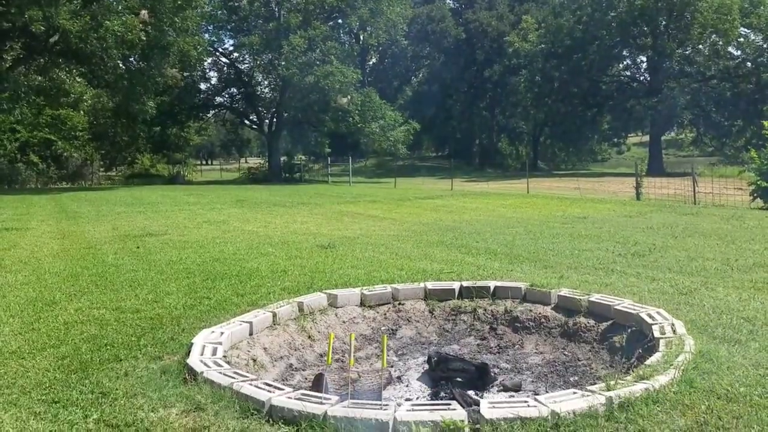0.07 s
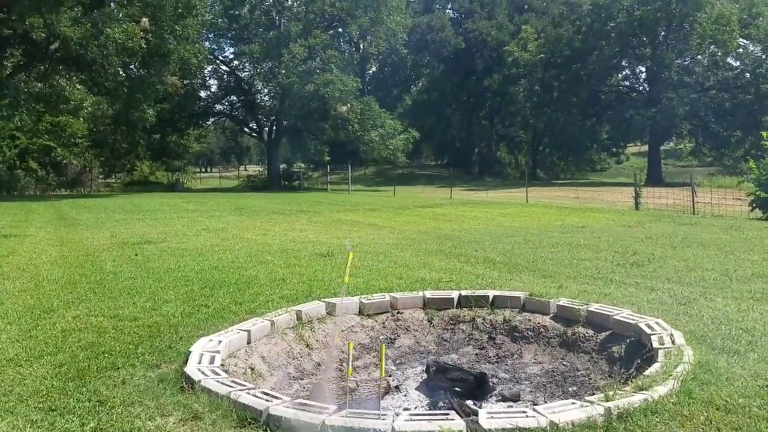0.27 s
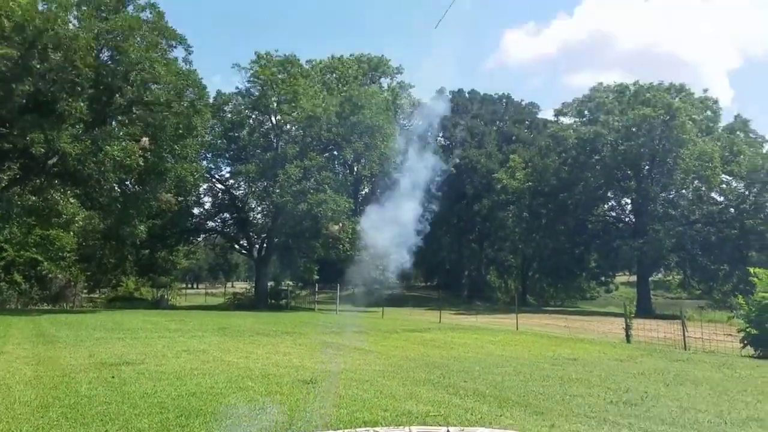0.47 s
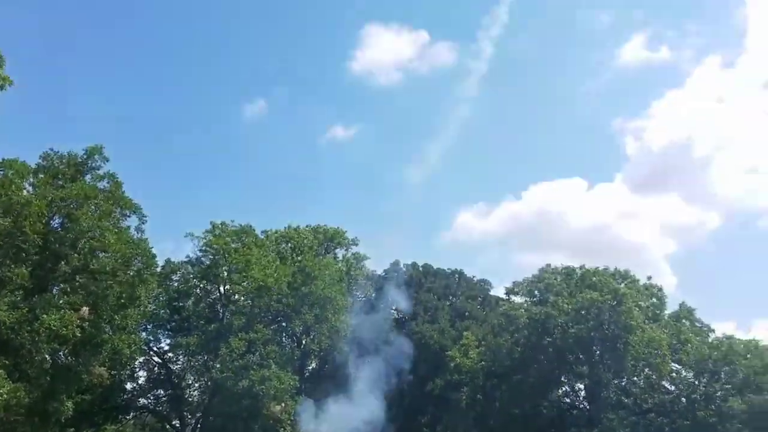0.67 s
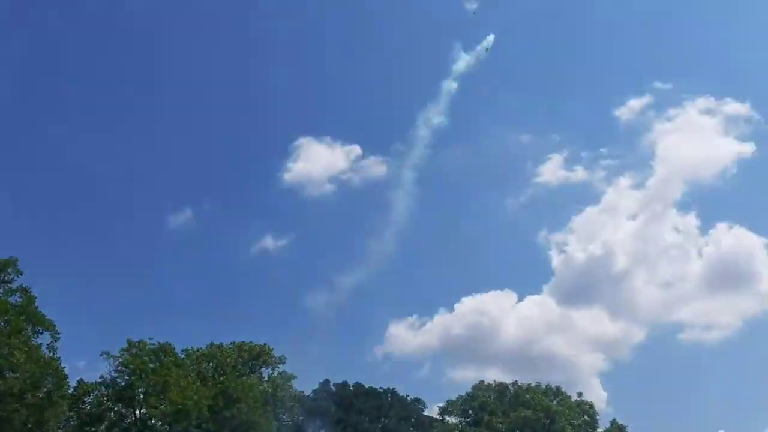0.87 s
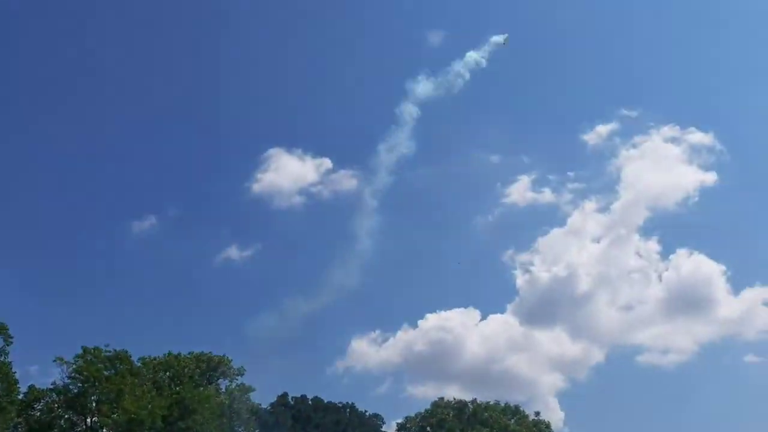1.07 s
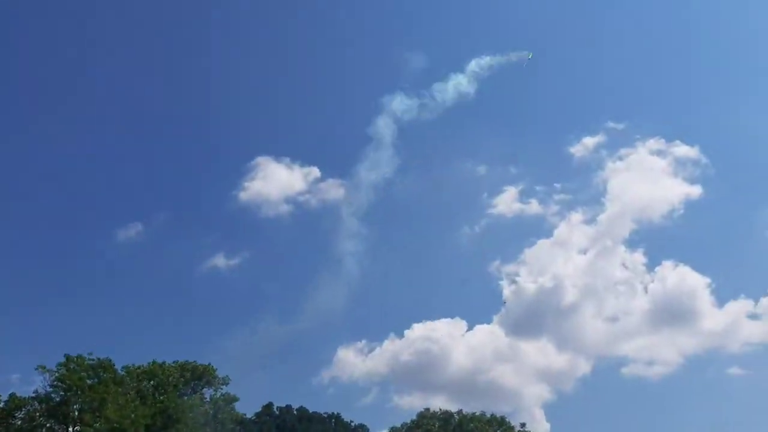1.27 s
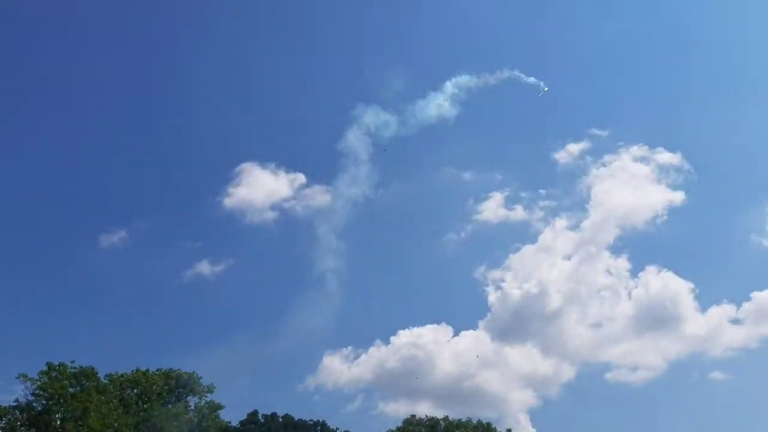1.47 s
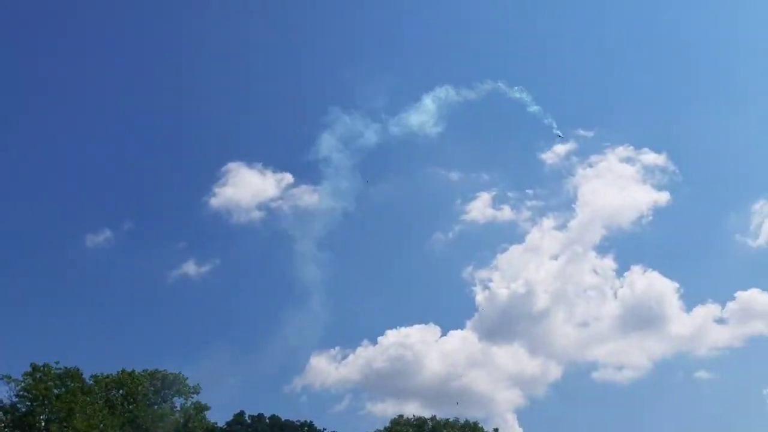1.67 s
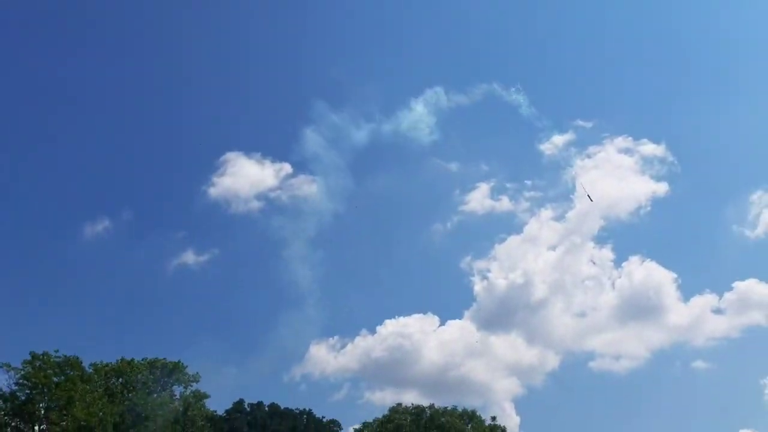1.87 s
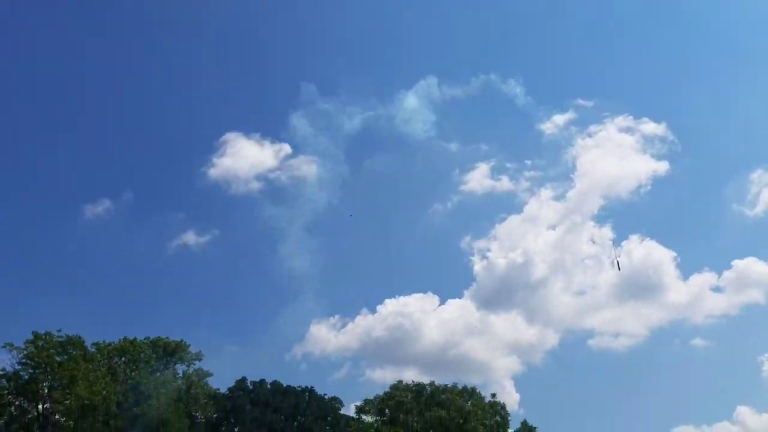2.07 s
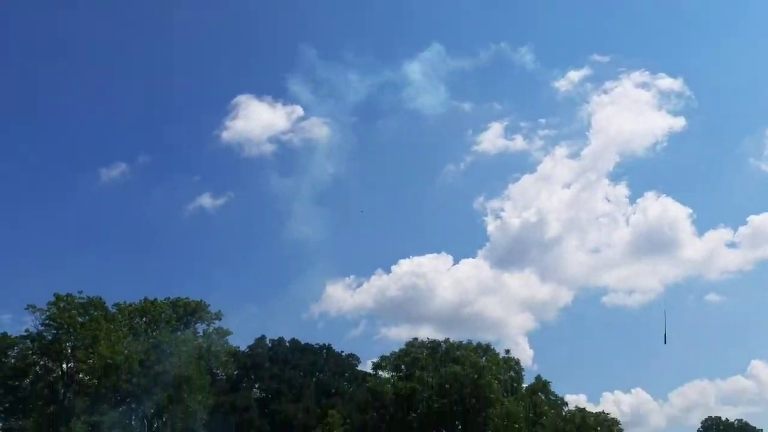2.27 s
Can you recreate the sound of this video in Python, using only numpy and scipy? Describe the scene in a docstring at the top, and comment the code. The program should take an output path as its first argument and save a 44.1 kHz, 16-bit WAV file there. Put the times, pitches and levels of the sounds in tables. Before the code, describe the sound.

A small firework rocket fizzes faintly, ignites in a stone pit, roars briefly past the close microphone and fades upward; two sharp overloaded cracks follow, scattering off grass and trees in an open yard.

```python
"""A fuse fizzes in a stone fire pit on a lawn ringed by trees: coloured noise, echoed by the pit walls.
The bottle rocket's motor lights, roars past the microphone and fades into the sky: sputtering noise.
Two charges crack overhead: noise bursts, blast waves and ringing tones, overloaded together.
Grass, yard and trees scatter each crack as decaying noise; distant surfaces return dull ticks.
Faint hum, air and hiss run throughout as shaped noise; the hiss swells after the bursts."""
import sys
import numpy as np
from scipy import signal
from scipy.fft import rfft, irfft
from scipy.io import wavfile

SR = 44100
rng = np.random.default_rng(int(sys.argv[2]) if len(sys.argv) > 2 else 0)


def master_out(mix):
    """Clip the mix to full scale and print it as 16-bit PCM to the path in sys.argv[1]."""
    frames = np.transpose(np.atleast_2d(mix))
    ceiling = np.clip(frames, -1, 1)
    pcm = np.round(ceiling * 32767).astype(np.int16)
    wavfile.write(sys.argv[1], SR, pcm)


N = 101429
T, HZ = np.arange(N) / SR, np.fft.rfftfreq(N, 1 / SR)

# Every *_COLOUR is a relative spectrum, every *_LEVEL a gain over time.
# Low distant hum: (frequency [Hz], level [dB])
HUM_COLOUR = [(25, -4.5), (60, -5.5), (110, 2), (150, 5.5), (220, -6), (400, -4), (800, -20), (2000, -26)]
# Hum: (time [s], level [dB])
HUM_LEVEL = [(0, -63.5), (.17, -57.5), (.2, -83), (.52, -89.5), (.65, -67), (.8, -75), (1.05, -83.5),
             (1.3, -75.5), (1.62, -73.5), (1.74, -66), (2.3, -63)]
# Soft air: (frequency [Hz], level [dB])
AIR_COLOUR = [(60, -24.5), (180, -11.5), (280, 3), (400, -4.5), (900, 2), (2100, 4.5), (3500, -0.5),
              (7500, -10), (9500, -25), (15000, -17)]
# Air: (time [s], level [dB])
AIR_LEVEL = [(0, -61), (.4, -71), (.8, -67.5), (1.5, -63.5), (1.75, -60), (2.3, -63)]
# Thin hiss: (frequency [Hz], level [dB])
HISS_COLOUR = [(1760, -53), (3000, -16), (3190, -11), (3870, -13), (4000, -14.5), (6470, -2.5),
               (7640, -2.5), (9340, -19.5), (13700, -3), (14800, -3.5)]
# Hiss: (time [s], level [dB])
HISS_LEVEL = [(1.2, -77), (1.55, -68.5), (1.75, -60.5), (2.0, -58), (2.15, -55), (2.27, -53)]
HISS_PAN_DB = 7

# Fuse fizz: (frequency [Hz], level [dB])
FUSE_COLOUR = [(180, -29), (300, -10), (866, -33.5), (955, -32.5), (1370, -13.5), (1930, -6), (3090, -9.5),
               (3350, -8.5), (7710, 2), (8780, -6.5), (14800, 0)]
# Motor still in the pit: (frequency [Hz], level [dB])
PIT_COLOUR = [(190, -41), (290, -7.5), (375, -18.5), (495, -2), (620, -18), (770, -24), (930, -13.5),
              (1110, -28), (1500, -5.5), (2200, -5.5), (2700, -9), (3200, -5.5), (4600, -6), (6000, 0),
              (8000, -0.5), (8900, -8), (10500, -7.5), (12000, -3), (14700, -3)]
# Fuse, then motor in the pit: (time [s], level [dB])
PIT_LEVEL = [(0, -42), (.13, -43), (.172, -35.5), (.2, -27), (.235, -16.5), (.28, -15.5), (.33, -15),
             (.36, -31), (.42, -40), (.5, -82)]
IGNITION_S, IGNITION_LENGTH_S = 0.18, 0.05
WALL_DELAY_S, WALL_SHARE, WALL_CUTOFF_HZ = 0.002, 0.17, 2500
FAR_WALL_DELAY_S, FAR_WALL_SHARE = 0.0053, 0.27

# Motor in flight: (frequency [Hz], level [dB])
FLIGHT_COLOUR = [(100, -57), (210, -29), (290, -21), (470, -5), (600, -10), (1000, -5.5), (1400, -2),
                 (2200, -4), (3400, -6.5), (5500, -5.5), (8100, -0.5), (9000, -7), (10300, -5.5),
                 (12500, -1), (14500, 0)]
# Motor in flight: (time [s], level [dB])
FLIGHT_LEVEL = [(.2, -90), (.28, -49), (.33, -14), (.36, -13.5), (.39, -15), (.425, -22.5), (.455, -25),
                (.5, -31), (.57, -39.5), (.62, -41.5), (.7, -50), (.82, -60.5), (.86, -95)]
CLIMB_S, CLIMB_LENGTH_S = 0.43, 0.12
SWEEP_S_PER_S, GROUND_SHARE = 0.04, 0.2
# Left-right likeness of the jet noise: (frequency [Hz], correlation [-1 to 1])
JET_LIKENESS = [(60, -.3), (290, 0.075), (640, .6), (1400, .65), (3100, 0.72), (7000, 0.53), (15000, 0.049)]
JET_LAG_S, JET_PAN_DB, JET_GRIT = 0.000031, 2, 0.34
SPUTTER_RMS_DB, SPUTTER_HZ = 1.0, 160

# Exhaust sweeping over the microphone: (frequency [Hz], level [dB])
ROAR_COLOUR = [(30, -35.5), (80, -14.5), (150, 7.5), (220, -11.5), (290, 1), (450, -4.5), (750, -2),
               (950, 2), (1150, -3.5), (1600, -8), (3500, -16), (9000, -44)]
ROAR_S, ROAR_HOLD_S, ROAR_DB = 0.345, 0.019, -22.5
ROAR_RISE_DB_PER_S, ROAR_FALL_DB_PER_S = 747, 577.5

# Motor wash returned by the trees: (frequency [Hz], level [dB])
JET_TREE_COLOUR = [(100, -39), (200, -3), (400, 0.5), (2000, -4.5), (4000, -10), (8000, -13),
                   (10000, -27.5)]
JET_TREE_DB = -28

# Bursts: (time [s], level [dB], thump time constant [s], relative thump level [dB],
#   ground reflection time constant [s], lower ring [Hz], upper ring [Hz], relative ring level [dB])
BURSTS = [(0.8394, 0, 0.00015, -11.5, 0.00011, 402, 596, -19.5),
          (0.9511, -1, 0.00083, -3, 0.00022, 571, 1185, -16)]
# Crack: (frequency [Hz], level [dB])
CRACK_COLOUR = [(40, -23.5), (150, -9), (420, -2), (750, -5.5), (1300, 4), (2100, 4), (2800, 0.5),
                (5000, -15.5), (8000, -8.5), (9500, -25), (13500, -8), (15000, -8)]
CRACK_DB, CRACK_HOLD_S, CRACK_T60_S, OVERLOAD = -9.5, 0.0032, 0.0085, 0.9
# Thump delay: (left [s], right [s])
THUMP_DELAYS_S = (0.0024, .001)
THUMP_HZ = 1200
BODY_T60_S, BODY_LAG_S = 0.047, 0.00058
BOUNCE_DB, BOUNCE_DELAY_S, BOUNCE_HZ = 4.5, 0.0058, 3200

# Scatter from grass: (frequency [Hz], level [dB])
GRASS_COLOUR = [(59, -53), (100, -11), (555, -7.5), (1180, -10), (2450, -0.5), (2780, -9.5), (3500, -2.5),
                (5420, -15.5), (7740, -10.5), (8960, -19.5), (13600, -4.5), (14800, -16)]
# Scatter from the yard: (frequency [Hz], level [dB])
YARD_COLOUR = [(59, -74), (100, -42), (146, -28), (221, -21.5), (358, -11), (997, -13), (2030, -2),
               (5900, -11.5), (7900, -12.5), (8960, -16), (13600, -11.5), (14800, -17)]
# Scatter from trees: (frequency [Hz], level [dB])
TREE_COLOUR = [(100, -45), (200, -26), (340, -12.5), (750, -4.5), (1100, -5.5), (1600, -2.5), (2100, 0),
               (2700, -2), (3400, -8.5), (4500, -7.5), (6000, -14.5), (8000, -12.5), (9300, -27),
               (13000, -18.5), (14800, -21)]
GRASS_DB, GRASS_DELAY_S, GRASS_HOLD_S, GRASS_T60_S = -17, 0.006, 0.006, 0.086
YARD_DB, YARD_DELAY_S, YARD_HOLD_S, YARD_T60_S = -28, 0.021, 0.045, 0.41
TREE_DB, TREE_DELAY_S, TREE_HOLD_S, TREE_T60_S = -47.5, 0.16, 0.14, 0.95

# Distant echoes of the bursts: (time [s], level [dB])
ECHOES = [(0.895, -19), (1.0056, -17.5), (1.2155, -39), (1.325, -37), (1.382, -48), (1.396, -43),
          (1.439, -48.5), (1.4866, -45), (1.5, -50), (1.5958, -47.5), (1.975, -45.5), (2.0823, -45)]
# Distant echoes: (frequency [Hz], level [dB])
ECHO_COLOUR = [(200, -43), (700, -2.5), (1300, -8), (2200, 5.5), (2900, -4.5), (4000, -11), (8000, -37),
               (9500, -40), (15000, -33.5)]
ECHO_DB, ECHO_T60_S = -3, 0.018

BASS_CUT_HZ = 240  # jet, scatter and echoes
LOW_CUT_HZ, CUTOFF_HZ = 61, 14750  # microphone, band limit


def amp(db):
    """Decibels to gain."""
    return 10 ** (np.asarray(db) / 20)


def unit(x):
    """Scales to rms 1."""
    return x / np.sqrt(np.mean(x ** 2) + 1e-20)


def by_hz(points):
    """Reads a table along log frequency."""
    hz, value = np.transpose(points)
    return np.interp(np.log(HZ + 1), np.log(np.abs(hz) + 1), value)


def level(points):
    """Gain over time from a table of dB."""
    return amp(np.interp(T, *np.transpose(points)))


def pan(db):
    """Left and right gains for a left-minus-right difference."""
    return amp(np.array([[db], [-db]]) / 2)


def noise(colour, alike=0, lag_s=0, grit=0):
    """Coloured stereo noise, rms 1; grit makes it spiky, alike correlates the sides, lag_s delays the right."""
    white = rng.standard_normal((2, N))
    spikes = np.exp(grit * rng.standard_normal(N))
    left, other = rfft(white * spikes)
    shared = np.clip(alike, -1, 1)
    right = shared * left + np.sqrt(1 - shared ** 2) * other
    right = right * np.exp(-2j * np.pi * HZ * lag_s)
    return unit(irfft(np.array([left, right]) * amp(by_hz(colour)), N))


def wobble(hz):
    """Random motion, rms 1, rolled off steeply above a rate."""
    spectrum = rfft(rng.standard_normal(N)) / (1 + (HZ / hz) ** 4)
    return unit(irfft(spectrum, N))


def envelope(start_s, rise_s, hold_s, t60_s):
    """Linear rise, then exponential decay from hold_s after the start."""
    t = T - start_s
    decay = np.exp(-np.log(1000) * np.maximum(t - hold_s, 0) / t60_s)
    return np.clip(t / rise_s, 0, 1) * decay


def delayed(x, delay_s):
    """Delays both channels by a fixed or moving time."""
    return np.array([np.interp(T - delay_s, T, side, left=0) for side in x])


def cut_bass(x):
    """Steep high-pass: removes the bass below BASS_CUT_HZ."""
    return signal.sosfilt(signal.butter(4, BASS_CUT_HZ, "high", fs=SR, output="sos"), x)


def background():
    """Low distant hum, soft air and a thin, unsteady hiss that swells after the bursts."""
    hum = noise(HUM_COLOUR, 0.93) * level(HUM_LEVEL)
    air = noise(AIR_COLOUR, 0.064) * level(AIR_LEVEL)
    hiss = noise(HISS_COLOUR, grit=0.4) * level(HISS_LEVEL) * pan(HISS_PAN_DB)
    return hum + air + hiss * amp(0.59 * wobble(hz=61.1))


def jet_noise(colour):
    """Spiky noise with the jet's stereo likeness and direction."""
    return noise(colour, by_hz(JET_LIKENESS), JET_LAG_S, JET_GRIT)


def pit():
    """Fuse fizz gives way to the motor; both reflect from the pit walls."""
    lit = np.clip((T - IGNITION_S) / IGNITION_LENGTH_S, 0, 1)
    fuse = np.sqrt(1 - lit) * jet_noise(FUSE_COLOUR)
    motor = np.sqrt(lit) * jet_noise(PIT_COLOUR)
    out = (fuse + motor) * level(PIT_LEVEL)
    out = out + FAR_WALL_SHARE * delayed(out, FAR_WALL_DELAY_S)
    b, a = signal.butter(1, WALL_CUTOFF_HZ, fs=SR)
    return out + WALL_SHARE * signal.lfilter(b, a, delayed(out, WALL_DELAY_S))


def flight():
    """The motor in flight; its ground reflection lags more as the rocket climbs."""
    motor = jet_noise(FLIGHT_COLOUR) * level(FLIGHT_LEVEL)
    lag_s = WALL_DELAY_S + SWEEP_S_PER_S * np.clip(T - CLIMB_S, 0, CLIMB_LENGTH_S)
    return motor + GROUND_SHARE * delayed(motor, lag_s)


def exhaust_roar():
    """Low roar as the exhaust sweeps over the microphone."""
    rise_db = ROAR_RISE_DB_PER_S * np.maximum(ROAR_S - T, 0)
    fall_db = ROAR_FALL_DB_PER_S * np.maximum(T - ROAR_S - ROAR_HOLD_S, 0)
    return noise(ROAR_COLOUR, by_hz(JET_LIKENESS)) * amp(ROAR_DB - rise_db - fall_db)


def rocket():
    """Pit, flight and roar share one random sputter."""
    jet = pit() + flight()
    roar = exhaust_roar()
    sputter = amp(SPUTTER_RMS_DB * wobble(SPUTTER_HZ))
    return cut_bass(jet * sputter) * pan(JET_PAN_DB) + roar * sputter


def trees(jet):
    """The tree line returns a dull wash of the motor: convolution with decaying noise."""
    tail = noise(JET_TREE_COLOUR) * envelope(0.013, 0.041, 0.23, 0.89)
    tail = tail / np.linalg.norm(tail[0])
    return amp(JET_TREE_DB) * signal.fftconvolve(jet, tail, axes=1)[:, :N]


def shock(start_s, length_s, hz):
    """Blast wave: a pressure jump and a longer suction, its front rounded by a low-pass."""
    u = np.maximum(T - start_s, 0) / length_s
    pressure = np.gradient(u * np.exp(-u)) * length_s * SR
    b, a = signal.butter(2, hz, fs=SR)
    return signal.lfilter(b, a, pressure)


def body_ring(start_s, low_hz, high_hz):
    """Two short decaying tones, their phase lagging on the left."""
    t = T - start_s - np.array([[BODY_LAG_S], [0]])
    tones = np.sin(2 * np.pi * low_hz * t) + np.sin(2 * np.pi * high_hz * t)
    return envelope(start_s, 0.00082, 0.0013, BODY_T60_S) * tones


def scatter(start_s):
    """Grass, yard and trees return ever later, longer decaying noise."""
    grass = amp(GRASS_DB) * noise(GRASS_COLOUR, 0.055, grit=0.29)
    grass *= envelope(start_s + GRASS_DELAY_S, 0.00059, GRASS_HOLD_S, GRASS_T60_S)
    yard = amp(YARD_DB) * noise(YARD_COLOUR, 0.063, grit=0.12)
    yard *= envelope(start_s + YARD_DELAY_S, 0.0027, YARD_HOLD_S, YARD_T60_S)
    far = amp(TREE_DB) * noise(TREE_COLOUR, grit=0.35)
    far *= envelope(start_s + TREE_DELAY_S, 0.029, TREE_HOLD_S, TREE_T60_S)
    return cut_bass((grass + yard + far) * amp(0.96 * wobble(hz=214)) * pan(1.5))


def burst(start_s, db, thump_s, thump_db, bounce_s, low_hz, high_hz, body_db):
    """A crack that overloads the microphone, its ground reflection and its scatter."""
    crack = amp(CRACK_DB) * noise(CRACK_COLOUR, 0.042)
    crack *= envelope(start_s, 0.0001, CRACK_HOLD_S, CRACK_T60_S)
    thump = np.array([shock(start_s + lag_s, thump_s, THUMP_HZ) for lag_s in THUMP_DELAYS_S])
    body = amp(body_db) * body_ring(start_s, low_hz, high_hz)
    direct = OVERLOAD * np.tanh((crack + amp(thump_db) * thump + body) / OVERLOAD)
    bounce = amp(BOUNCE_DB) * shock(start_s + BOUNCE_DELAY_S, bounce_s, BOUNCE_HZ)
    return amp(db) * (direct + bounce + scatter(start_s))


def echoes():
    """Distant surfaces return the bursts as short dull ticks of noise."""
    ticks = sum(amp(db) * envelope(start_s, 0.00057, 0.00073, ECHO_T60_S) for start_s, db in ECHOES)
    return amp(ECHO_DB) * cut_bass(noise(ECHO_COLOUR, 0.46) * ticks) * pan(3.0)


def scene():
    """Launch, two bursts and the garden around them."""
    jet = rocket()
    wash = trees(jet)
    bursts = sum(burst(*row) for row in BURSTS)
    return jet + wash + bursts + echoes() + background()


def record(dry):
    """The microphone thins the deepest bass; a linear-phase low-pass limits the band."""
    b, a = signal.butter(2, LOW_CUT_HZ, "high", fs=SR)
    band_limit = signal.firwin(1023, CUTOFF_HZ, window=("kaiser", 8), fs=SR)
    return signal.oaconvolve(signal.lfilter(b, a, dry), band_limit[None], "same")


dry = scene()
out = record(dry)
master_out(out)
```